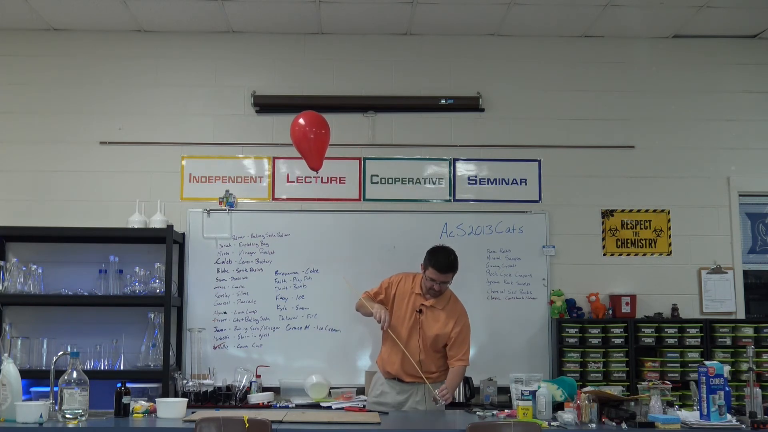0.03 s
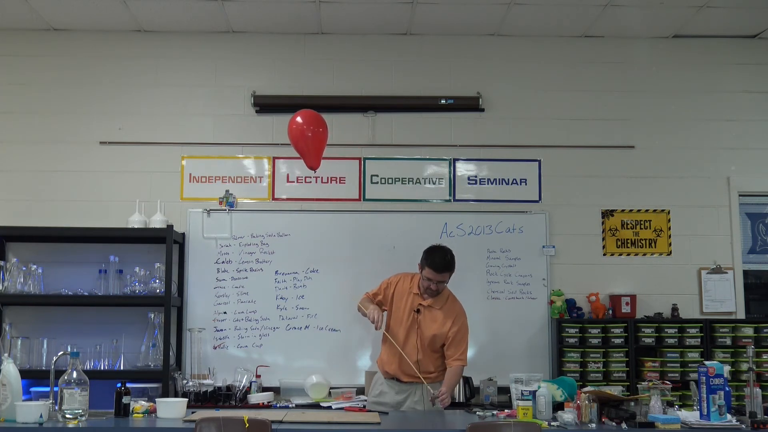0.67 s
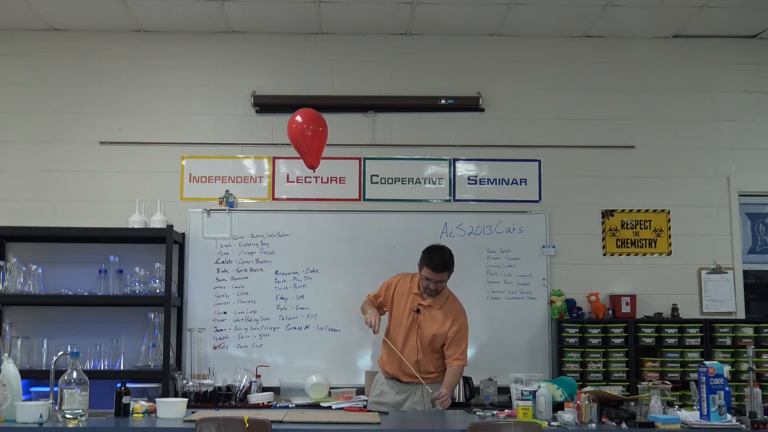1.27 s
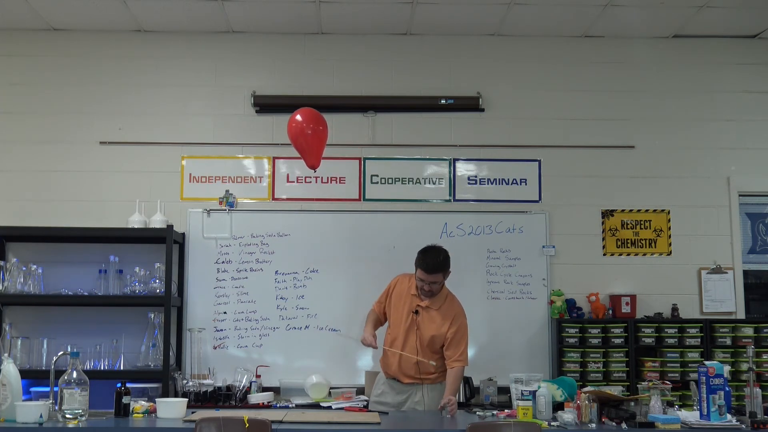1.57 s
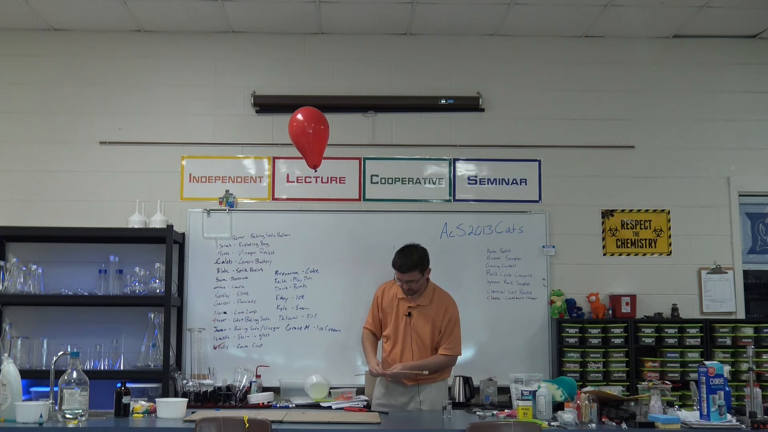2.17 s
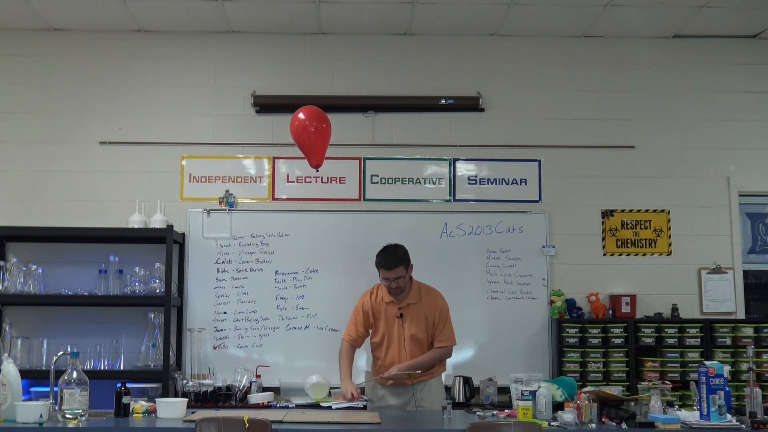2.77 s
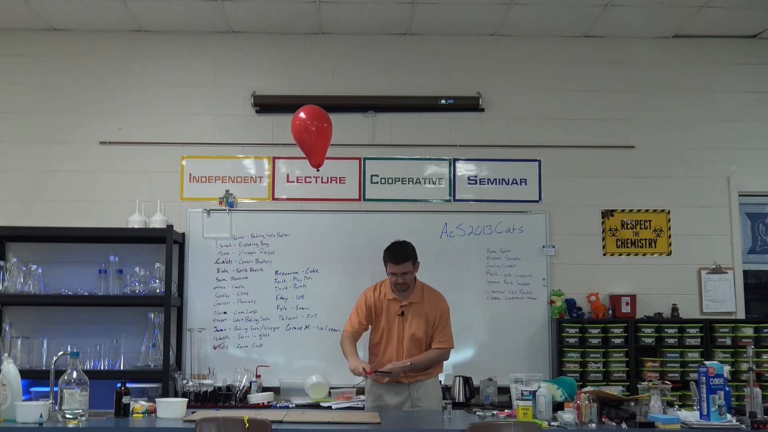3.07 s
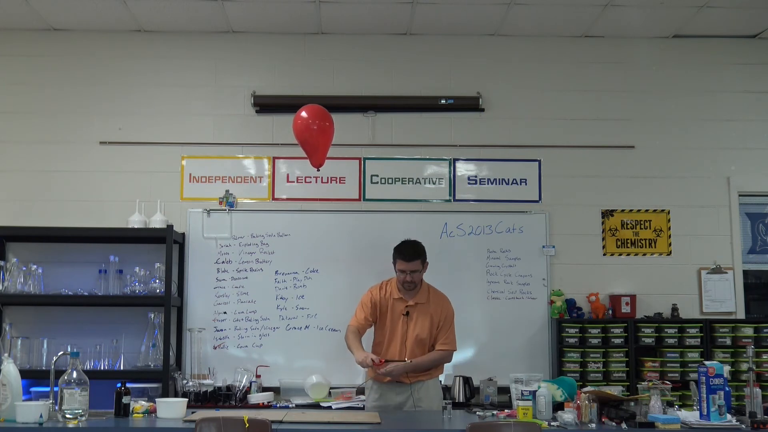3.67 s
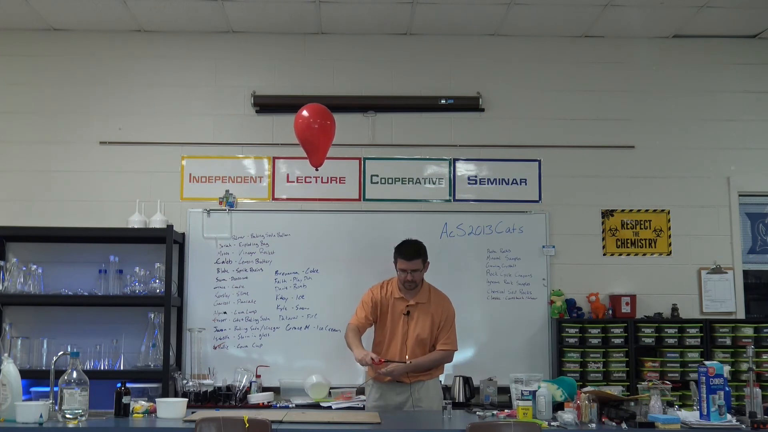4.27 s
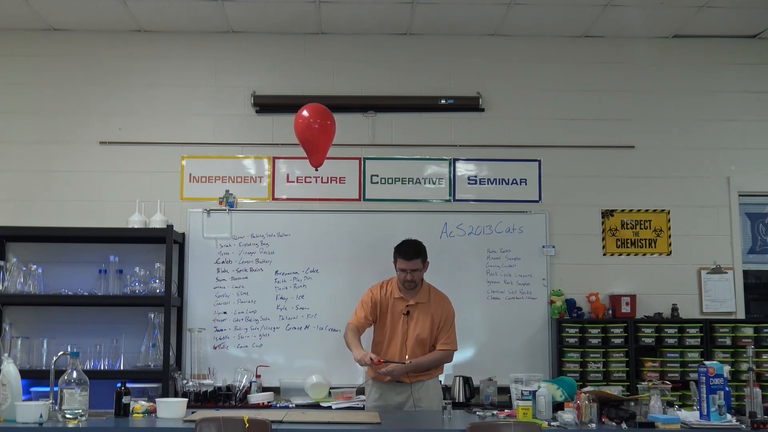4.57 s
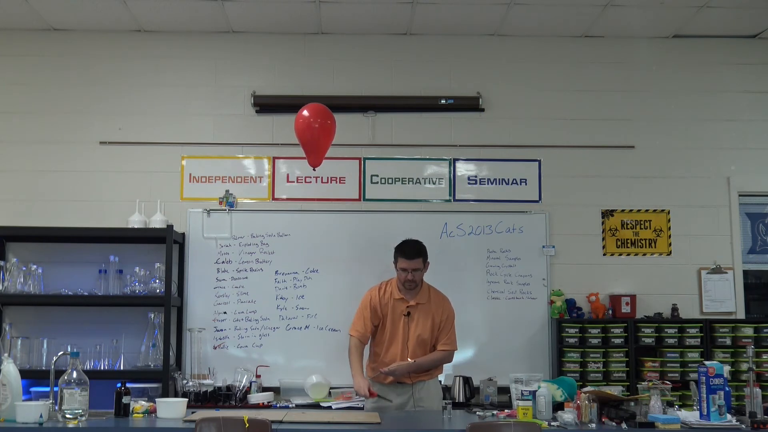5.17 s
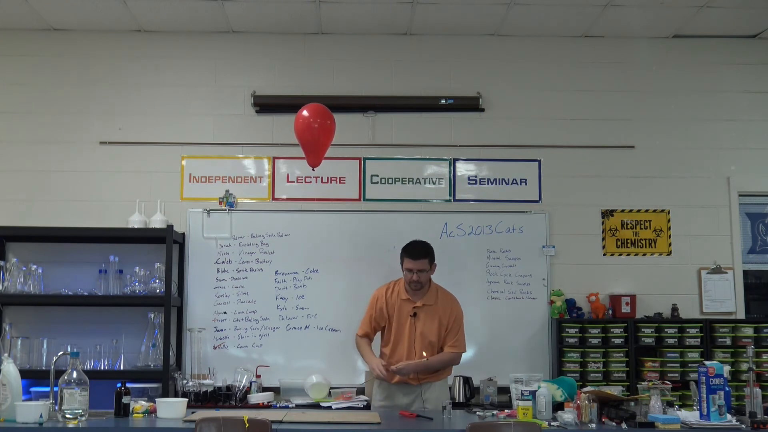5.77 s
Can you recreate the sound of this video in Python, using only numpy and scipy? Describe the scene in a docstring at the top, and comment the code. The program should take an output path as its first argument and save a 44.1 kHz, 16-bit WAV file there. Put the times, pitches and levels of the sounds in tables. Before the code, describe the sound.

Ventilation rumbles low in a quiet classroom. A wooden stick lands on a bench with a dull slap and a small bounce. A plastic lighter is dragged off the bench, ticks faintly in the fingers, then fires with one sharp snap and releases with a softer click. It is set down with knocks, a short slide and a hollow clatter. The clicks sound close, the bench slightly farther off.

```python
"""Stick and lighter on a classroom bench

A wooden stick lands on a bench with dull slaps and bounces. A plastic lighter is dragged off
the bench, clicks in the fingers, snaps once as its spring hammer fires, and is released.
Set down again, it knocks, slides and clatters, ringing its hollow case and the bench top.
Ventilation rumbles underneath and the quiet room answers softly."""
import sys
import numpy as np
from scipy import signal
from scipy.fft import rfft, irfft, next_fast_len
from scipy.io import wavfile
from scipy.ndimage import uniform_filter1d, map_coordinates

SR = 44100
rng = np.random.default_rng(int(sys.argv[2]) if len(sys.argv) > 2 else 0)


def inscribe(sig):
    """Save sig as 16-bit PCM at rate SR to the path in sys.argv[1].

    A 1-D sig is mono; a 2-D sig holds one channel per row.
    Samples are clipped to [-1, 1] before scaling.
    """
    pcm = np.round(np.clip(np.atleast_2d(sig).T, -1, 1) * 32767)
    wavfile.write(sys.argv[1], SR, pcm.astype(np.int16))


N = 257411


def amp(db):
    """Decibels to gain."""
    return 10 ** (np.asarray(db) / 20)


def unit(x):
    """Scale to rms 1."""
    return x / np.sqrt(np.mean(x ** 2) + 1e-20)


def along(curve, hz):
    """Read a curve of (freq_hz, value) points on a log frequency axis."""
    freqs, values = np.transpose(curve)
    return np.interp(np.log(hz + 1), np.log(freqs + 1), values)


def fade(t, t60):
    """Exponential decay by 60 dB in t60 seconds."""
    return amp(-60 * t / t60)


def add(track, start_s, sound):
    """Mix a sound into the track."""
    part = track[round(start_s * SR):][:len(sound)]
    part += sound[:len(part)]


def hit_eq(x, spectrum):
    """Minimum-phase EQ, so that nothing sounds before a hit."""
    size = 2 * next_fast_len(len(x))
    gain = amp(along(spectrum, np.fft.rfftfreq(size, 1 / SR)))
    cepstrum = irfft(np.log(gain), size)
    cepstrum[1:size // 2] *= 2
    cepstrum[size // 2 + 1:] = 0
    return irfft(rfft(x, size) * np.exp(rfft(cepstrum)), size)[:len(x)]


def noise_eq(x, spectrum):
    """Give a long noise its spectrum, rms 1."""
    size = next_fast_len(N)
    gain = amp(along(spectrum, np.fft.rfftfreq(size, 1 / SR)))
    return unit(irfft(rfft(x, size) * gain, size)[:N])


def push(spectrum, size=2048):
    """A single smooth pulse of peak 1."""
    pulse = hit_eq(signal.unit_impulse(size), spectrum)
    return pulse / np.abs(pulse).max()


def ring(modes, rise_s):
    """A struck body's damped modes, peak 1; each contact excites them a little differently."""
    hz, db, t60 = np.transpose(modes)[:, :, None]
    t = np.arange(int(t60.max() * SR) + 64) / SR
    gain = amp(db + 1.2 * rng.standard_normal(db.shape))
    polarity = (-1) ** np.arange(len(hz))[:, None]
    partials = polarity * gain * fade(t, t60) * np.sin(2 * np.pi * hz * t)
    sound = partials.sum(axis=0) * (1 - np.exp(-t / rise_s))
    return sound / np.abs(sound).max()


def crack(spectrum, t60, size=2048):
    """The brief noise burst of two hard surfaces meeting, peak near 1."""
    noise = unit(hit_eq(rng.standard_normal(size), spectrum))
    return noise * fade(np.arange(size) / SR, t60) / 2


# Tone of the moving air: freq_hz, gain_db
AIR_EQ = [(8.8, -29), (15, -1.5), (38, -2), (65, -15), (103, -15), (126, -20.5), (155, -19), (179, -26.5),
          (294, -32), (330, -33.5), (371, -31.5), (527, -39.5), (793, -42), (2400, -60.5), (16000, -74.5)]

def ventilation(level_db=-46):
    """A steady deep rumble that thins out into faint hiss."""
    return amp(level_db) * noise_eq(rng.standard_normal(N), AIR_EQ)


# Woody ring of the stick, deep ring of the bench board: pitch_hz, level_db, t60_s
STICK_MODES = [(303, -8, .08), (440, 3, 0.048), (620, -1, 0.03), (800, 4, 0.047), (1020, -10, .035),
               (1300, -25, .03), (2010, -14, 0.036), (2660, -16.5, .07), (5290, -26, 0.07)]
BOARD_MODES = [(193, -7.5, 0.15), (270, -5, 0.058), (302, -1, 0.039), (388, 0, 0.031), (487, -2, 0.037),
               (579, -4.5, 0.031)]
# Dull body and bright edge of a slap: freq_hz, gain_db
THUD_EQ = [(60, -22), (180, -6.5), (450, 2), (780, 2.5), (1100, -6), (1600, -26.5), (2500, -23.5),
           (3600, -47), (8000, -54), (16000, -59)]
CLATTER_EQ = [(300, -13), (1000, -2), (2400, 0.5), (3600, -10.5), (8000, -23), (16000, -46)]
# Tip, middle and far end come down in turn: delay_s, offset_db
SLAPS = [(0, 0), (.0064, -10.5), (.0133, -8)]
# The stick lands and bounces: start_s, strength_db
LANDINGS = [(1.596, -16), (1.7026, -29), (1.752, -45.5)]

def stick(ring_db=-9, hand_damping_db=12):
    """Dull slaps ring the board and the stick, which the hand damps; hard ones also clatter."""
    track = np.zeros(N)
    hardest_db = max(row[1] for row in LANDINGS)
    for start_s, strength_db in LANDINGS:
        for slap, (delay_s, offset_db) in enumerate(SLAPS):
            at_s = start_s + delay_s
            thud_db = strength_db + offset_db
            wood_db = strength_db + ring_db - slap * hand_damping_db
            clatter_db = -36 + 1.3 * (thud_db - hardest_db)
            add(track, at_s, amp(thud_db) * push(THUD_EQ))
            add(track, at_s, amp(wood_db) * ring(STICK_MODES, rise_s=.0015))
            add(track, at_s, amp(thud_db - 15.5) * ring(BOARD_MODES[:2], rise_s=.0015))
            add(track, at_s, amp(clatter_db) * crack(CLATTER_EQ, t60=.038))
    return track


# The bench's brighter panel, the lighter's hollow case: pitch_hz, level_db, t60_s
PANEL_MODES = [(650, -3.5, 0.03), (840, 0, 0.029), (1120, -15, 0.034), (1400, -5, 0.026)]
CASE_MODES = [(1120, -11, .008), (1560, -1, .011), (1840, 0, .009), (2450, -11, .006), (3100, -10, .006)]
# Hard attack of a knock on the bench: freq_hz, gain_db
CLACK_EQ = [(200, 5), (700, -3), (2200, 2.5), (4000, 0), (7500, -6), (11000, -15.5), (16000, -27)]
# Two stick taps, then the lighter's knocks: start_s, strength_db, panel_offset_db, case_offset_db
KNOCKS = [(1.667, -55, -10, -10), (1.839, -58.5, 4, -3), (2.6411, -38, -7, 3), (2.7045, -48, 2, 3),
          (2.7735, -49, 0, 7), (5.405, -32, 4, -16), (5.581, -21, -8, -3), (5.6266, -26.5, -10, 6),
          (5.6375, -29.5, -2, 0), (5.6428, -30, 0, -6), (5.663, -32, -12, -11), (5.6684, -35.5, -17, -12),
          (5.6902, -36, -18, -16)]

def knocks(chatter_gap_s=.0027, chatter_loss_db=7, thump_s=5.5923, thump_db=-28):
    """The stick's last light taps, then the plastic lighter's knocks, chatter on the bench top."""
    track = np.zeros(N)
    hardest_db = max(row[1] for row in KNOCKS)
    for start_s, strength_db, panel_db, case_db in KNOCKS:
        for bounce in range(3):
            at_s = start_s + bounce * chatter_gap_s * rng.uniform(.85, 1.15)
            contact_db = strength_db - bounce * chatter_loss_db
            # the deep board rings mostly under hard knocks
            board_db = contact_db - 2.5 + .25 * (contact_db - hardest_db)
            add(track, at_s, amp(board_db) * ring(BOARD_MODES, rise_s=.0005))
            add(track, at_s, amp(contact_db + panel_db) * ring(PANEL_MODES, rise_s=.0003))
            add(track, at_s, amp(contact_db + case_db) * ring(CASE_MODES, rise_s=.00043))
            add(track, at_s, amp(contact_db) * crack(CLACK_EQ, t60=.022))
    # the hand thumps down just after the lighter
    add(track, thump_s, amp(thump_db) * ring(BOARD_MODES, rise_s=.0005))
    return track


def stroke(move, attack_s=.028, release_s=.018, wobble_db=1.5, wobbles_per_s=45):
    """Envelope of one hand movement: it gets going, eases off with unsteady pressure and stops."""
    start_s, length_s, level_db, easing_db_per_s = move
    t = np.arange(N) / SR - start_s
    held_s = np.clip(t, 0, length_s)
    wobble = map_coordinates(rng.standard_normal(64), [held_s * wobbles_per_s], mode="mirror")
    gate = np.clip(t / attack_s, 0, 1) * np.exp(-np.maximum(t - length_s, 0) / release_s)
    return gate * amp(level_db - easing_db_per_s * held_s + wobble_db * wobble)


def friction(spectrum, slips_per_s, spread_db):
    """Tiny slips of uneven size through the resonances of the rubbed things, rms 1."""
    slips = rng.random(N) < slips_per_s / SR
    sizes = rng.uniform(-1.1, 1, N) * amp(spread_db * rng.standard_normal(N))
    return noise_eq(slips * sizes, spectrum)


def wandering(x, depth_db=3, size=1024):
    """As the contact point moves, narrow resonances swell and fade for some tens of ms each."""
    bands = signal.stft(x, nperseg=size)[2]
    swell = uniform_filter1d(rng.standard_normal(bands.shape), size=4, axis=0)  # across pitch
    swell = uniform_filter1d(swell, size=5, axis=1)  # across time
    bands = bands * amp(depth_db * unit(swell))
    return unit(signal.istft(bands * amp(depth_db * 0), nperseg=size)[1][:N])


# A brush of hand or stick, then the lighter's drag off the bench, slide back on and last shove:
# start_s, length_s, level_db, easing_db_per_s
BRUSH = (2.37, .065, -66, 0)
PICKUP = (2.676, .104, -47.5, 10)
SLIDE = (5.408, .17, -44, 45)
SHOVE = (5.655, .2, -45, 8)
# Tone of each scrape: freq_hz, gain_db
BRUSH_EQ = [(300, -20), (600, -6), (800, 0), (1100, -14), (3000, -28), (12000, -48)]
PICKUP_EQ = [(130, -2), (220, -5), (330, -14), (500, -8), (700, -7), (1080, -2), (1350, 0), (1650, -5),
             (2200, -9.5), (2700, -18), (3200, -14), (4200, -25), (8500, -25), (16000, -42)]
SLIDE_EQ = [(250, -25), (450, -3), (660, 7), (880, 3.5), (1150, 1), (1500, 2.5), (2300, 1), (2850, 5.5),
            (3800, -6), (5000, -15), (7500, -6.5), (9000, -12), (12000, -30), (15000, -30)]
SHOVE_EQ = [(80, -27), (130, -4), (175, 4.5), (240, -3), (400, -5), (520, -6), (680, -6.5), (850, -9),
            (1000, -18.5), (1700, -9.5), (2600, -22), (4400, -25), (6500, -33), (9200, -32), (16000, -62)]

def scrapes():
    """A hand or the stick lightly brushes the bench, then the plastic lighter drags over it."""
    brush = stroke(BRUSH) * friction(BRUSH_EQ, slips_per_s=4000, spread_db=1.5)
    pickup = stroke(PICKUP) * wandering(friction(PICKUP_EQ, slips_per_s=3500, spread_db=1.5))
    slide = stroke(SLIDE) * wandering(friction(SLIDE_EQ, slips_per_s=9000, spread_db=0))
    shove = stroke(SHOVE) * wandering(friction(SHOVE_EQ, slips_per_s=6000, spread_db=2.5))
    return brush + pickup + slide + shove


# Bright ping of the lighter's steel spring: pitch_hz, level_db, t60_s
SPRING_MODES = [(4120, -9, 0.0026), (5450, -3, 0.0056), (6740, -1, 0.0089), (7210, -1, 0.0037),
                (7840, -2, 0.01), (8800, -8, .009), (9830, -8, .009), (10400, -8, 0.0076),
                (11100, -14, 0.0043), (13000, -15, 0.0075)]
# Tick of a light touch, and the pulse the lighter sends all round the room: freq_hz, gain_db
TICK_EQ = [(300, -21), (900, -3.5), (2000, 2), (3600, 2.5), (6500, -1.5), (9500, -13.5), (16000, -21)]
SEND_EQ = [(300, -31.5), (780, -15), (1080, 5.5), (1750, 5), (2400, -6), (4700, -2), (7500, -2),
           (10500, -7.5), (13000, -13), (16000, -22.5)]
# Trigger and case in the hand: start_s, strength_db, steel_db (up: more spring, less plastic)
CLICKS = [(2.6397, -30.5, 4), (2.8306, -51.5, 6), (3.0088, -53.5, -20), (3.328, -63, -10), (3.394, -63, 0),
          (3.4231, -54.5, 2), (3.5016, -54, -10), (4.6836, -54, 1), (4.9311, -52.5, 1), (4.9508, -38, 12),
          (4.9542, -33.5, 4), (4.971, -50, -2), (4.9935, -50.5, -9), (5.2085, -43.5, -7), (5.3426, -60, -3)]

def lighter_clicks():
    """The case pops, the spring pings and the plastic ticks; the room gets one pulse per click."""
    direct, send = np.zeros(N), np.zeros(N)
    pulse = push(SEND_EQ)
    for start_s, strength_db, steel_db in CLICKS:
        case_gain = amp(strength_db - 3 - .45 * steel_db)
        spring_gain = amp(strength_db - 7 + steel_db)
        add(direct, start_s, case_gain * ring(CASE_MODES, rise_s=.0002))
        add(direct, start_s, spring_gain * ring(SPRING_MODES, rise_s=.0002))
        add(direct, start_s, amp(strength_db) * crack(TICK_EQ, t60=.017))
        add(send, start_s, np.hypot(case_gain, spring_gain) * pulse)
    return direct + room(amp(9) * send, early_db=-12.5, late_db=-10.5)


# Rustle of skin on plastic: freq_hz, gain_db
SKIN_EQ = [(400, -17), (1500, 7), (3500, -1.5), (7000, -9.5), (15000, -29.5)]
# Shifts of grip: start_s, length_s, level_db, easing_db_per_s
GRIPS = [(2.88, .07, -73, 0), (3.15, .11, -81, 0), (3.275, .13, -71.5, 50), (4.85, .15, -83, 0),
         (5.26, .13, -74.5, 0)]

def fingers():
    """Fingertips slip over the case with a faint, grainy rustle."""
    pressure = sum(stroke(grip, attack_s=.05, release_s=.04) for grip in GRIPS)
    return pressure * friction(SKIN_EQ, slips_per_s=1200, spread_db=4.5)


# Pop of the lighter's barrel: pitch_hz, level_db, t60_s
BARREL_MODES = [(1090, 0, .011), (1250, -8, 0.011), (1700, -1.8, .01), (3280, -9, 0.0092)]
# Sharp edge of the snap: freq_hz, gain_db
CRACK_EQ = [(300, -21.5), (900, -8), (2000, 5), (6500, 3), (9500, -14.5), (12000, -12.5), (16000, -15.5)]
# The hammer fires, then the trigger bottoms out: start_s, barrel_db, spring_db, crack_db
SNAP_HITS = [(3.6555, -21, -11.5, -20), (3.6567, -16.7, -25, -27.5)]

def igniter_snap():
    """The hammer pings and the barrel pops; summed over all directions, the room gets one pulse."""
    direct, send = np.zeros(N), np.zeros(N)
    for start_s, barrel_db, spring_db, crack_db in SNAP_HITS:
        add(direct, start_s, amp(barrel_db) * ring(BARREL_MODES, rise_s=.00013))
        add(direct, start_s, amp(spring_db) * ring(SPRING_MODES, rise_s=.00024))
        add(direct, start_s, amp(crack_db) * crack(CRACK_EQ, t60=.02))
    # so small a body radiates no bass
    low_cut = signal.butter(N=10, Wn=900, btype="high", fs=SR, output="sos")
    add(send, SNAP_HITS[0][0], amp(-3.5) * push(SEND_EQ))
    return signal.sosfilt(low_cut, direct) + room(send, early_db=-13.5, late_db=-13)


# Decay of the classroom reverb: freq_hz, t60_s
ROOM_DECAY = [(150, .55), (1200, .53), (4000, .5), (8000, .45), (14000, .36)]
# Tone of its tail: freq_hz, gain_db
ROOM_EQ = [(100, 2), (500, -1.5), (4500, -1), (8000, -7), (14000, -5)]

def room(send, early_db, late_db, wall_delay_s=.034):
    """Near surfaces answer weakly at once; the walls return a fuller tail a little later."""
    hz, t, bands = signal.stft(rng.standard_normal(SR), SR, nperseg=256)
    decay = fade(t, along(ROOM_DECAY, hz)[:, None])
    tail = signal.istft(bands * decay, SR, nperseg=256)[1]
    tail = hit_eq(tail / np.linalg.norm(tail), ROOM_EQ)
    age_s = np.arange(len(tail)) / SR
    gain = np.where(age_s < wall_delay_s, amp(early_db), amp(late_db))
    return signal.fftconvolve(send, tail * gain)[:N]


def scene():
    """Mono mix: the bench is farther off than the snap and clicks, so it carries more room."""
    bench = stick() + knocks() + scrapes() + fingers()
    close = igniter_snap() + lighter_clicks()
    reverb = room(bench, early_db=-10.5, late_db=-7)
    return (close + bench + reverb + ventilation())[None]


def record(dry, top_hz=16100, slope_width_hz=400):
    """A steep high cut takes the very top off the mix."""
    size = next_fast_len(N + SR // 2)
    hz = np.fft.rfftfreq(size, 1 / SR)
    high_cut = np.clip((top_hz - hz) / slope_width_hz + .5, 0, 1)
    return irfft(rfft(dry, size) * high_cut, size)[..., :N]


dry = scene()
out = record(dry)
inscribe(out)
```